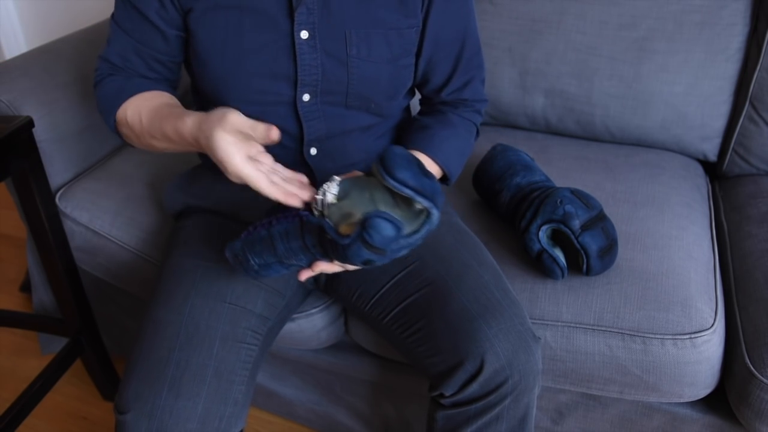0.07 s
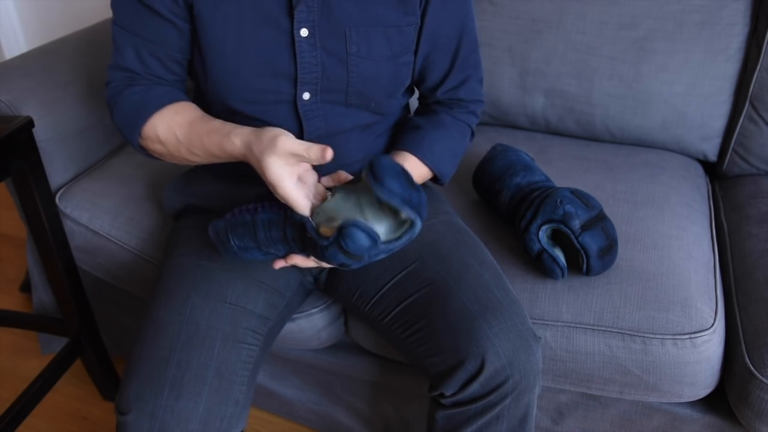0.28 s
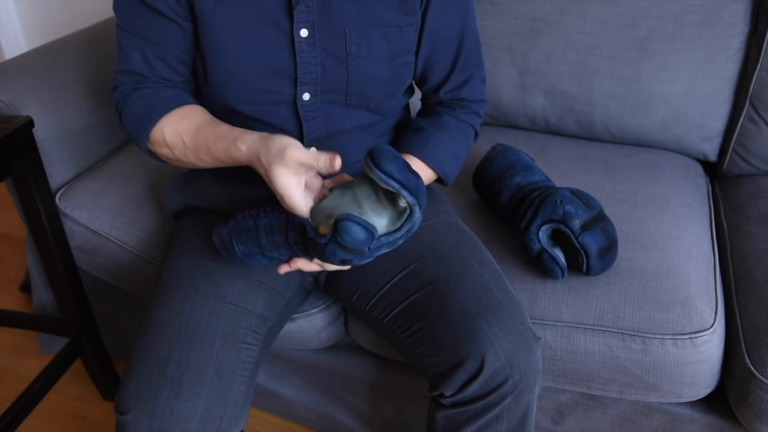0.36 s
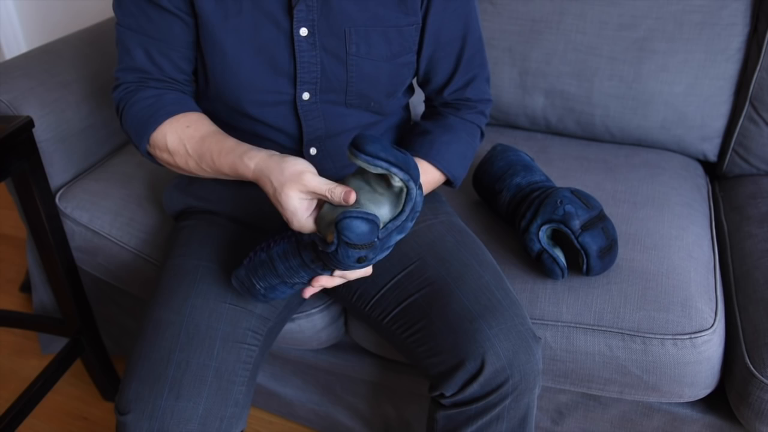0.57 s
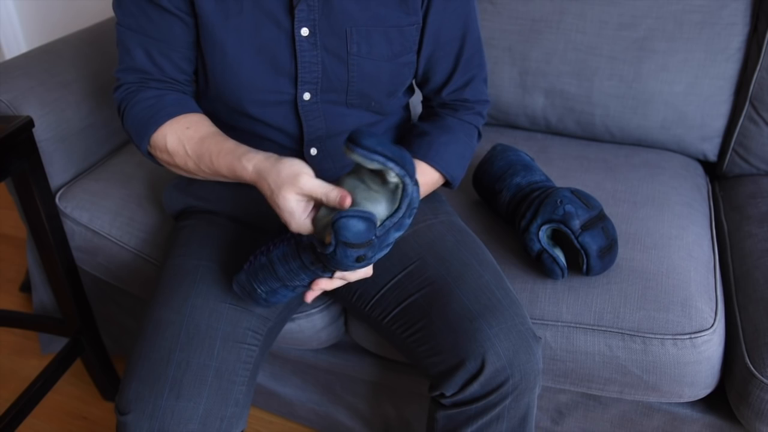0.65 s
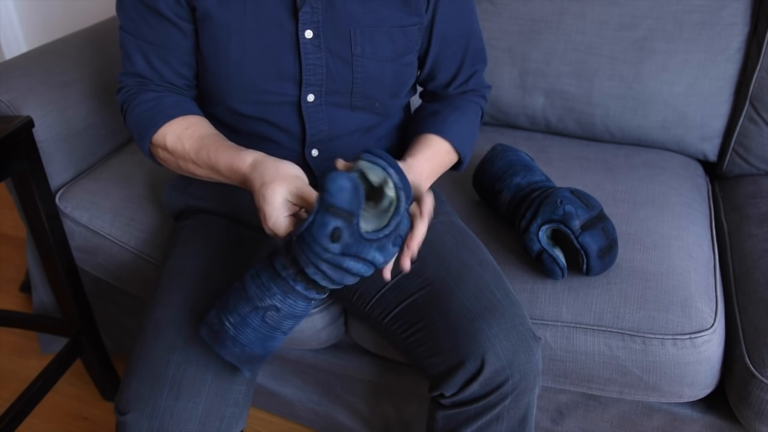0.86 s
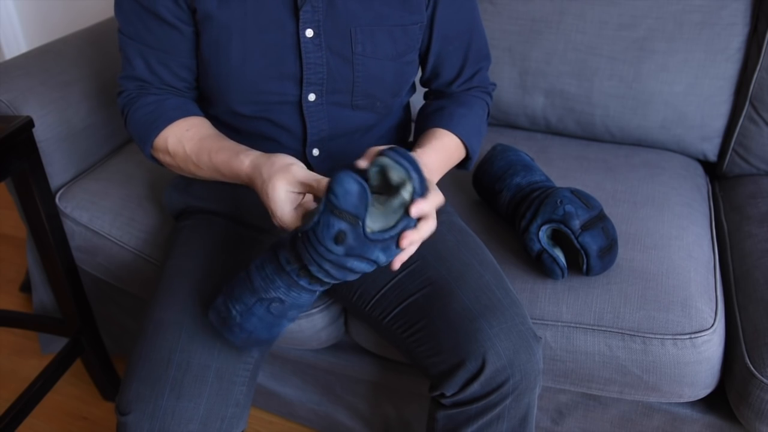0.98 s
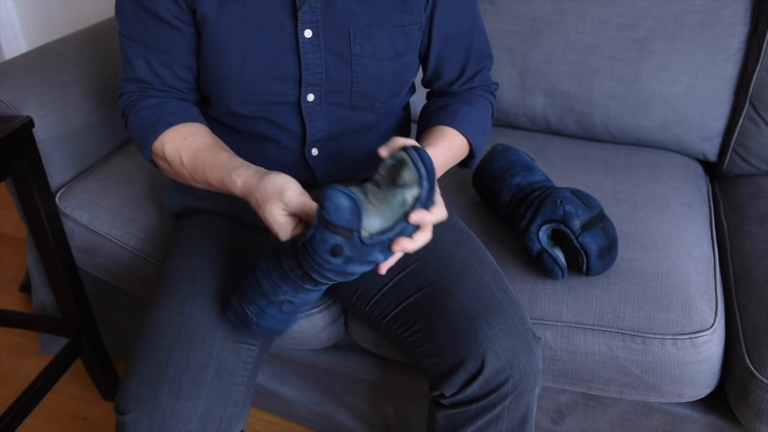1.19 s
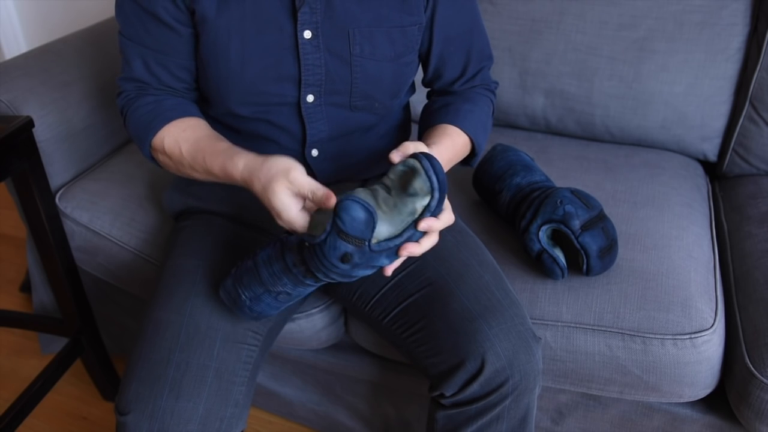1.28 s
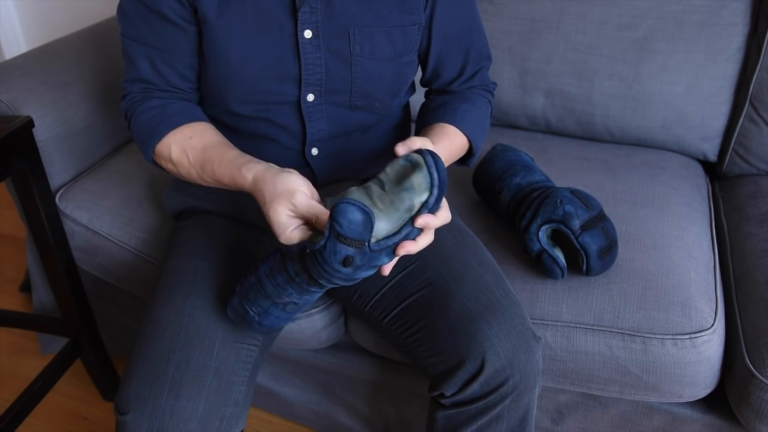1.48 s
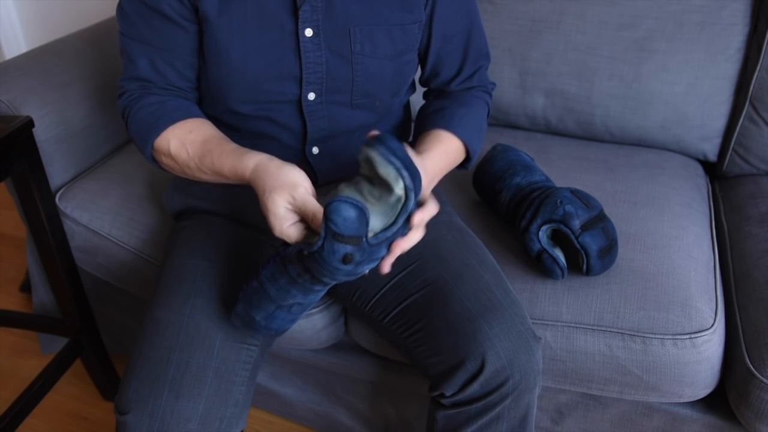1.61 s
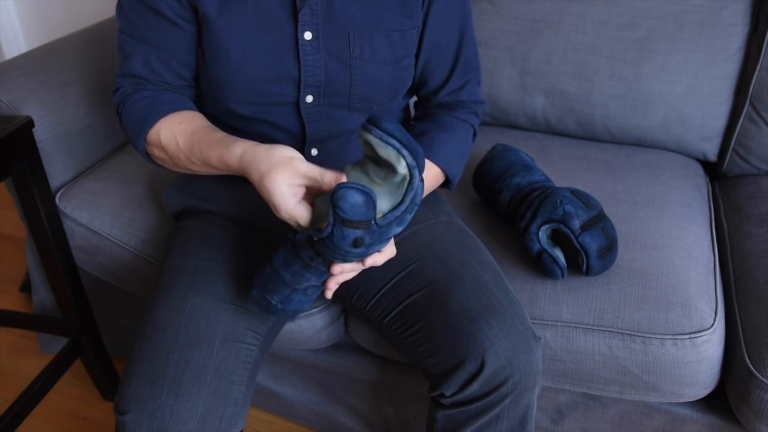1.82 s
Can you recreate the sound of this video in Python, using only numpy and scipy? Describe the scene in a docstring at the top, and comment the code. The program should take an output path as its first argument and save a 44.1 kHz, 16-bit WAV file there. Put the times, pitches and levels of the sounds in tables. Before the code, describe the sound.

Hands rub a padded glove close to the microphone in a quiet room. Dry scuffs, soft finger pats and small crease ticks come first, then lighter rustling strokes with a few more ticks and faint bumps.

```python
"""Close, dry rubbing and rustling: two hands turn a padded glove in a quiet furnished room.
In each stroke the skin catches and slips on the cover: the hollow padding murmurs, the cover rasps,
the weave hisses, and the harder scuffs make the padding groan. Fingers pat the padding and ring its
damped shell, creases tick as they snap over, and the glove bumps softly as it is shifted."""
import sys
import numpy as np
from scipy import signal
from scipy.fft import rfft, irfft
from scipy.io import wavfile

SR = 44100
rng = np.random.default_rng(int(sys.argv[2]) if len(sys.argv) > 2 else 0)


def bounce(signal):
    """Save signal as a 16-bit WAV file at the path given by the first command-line argument."""
    frames = np.transpose(np.atleast_2d(signal))
    limited = np.clip(frames, -1, 1)
    pcm = np.round(limited * 32767).astype(np.int16)
    wavfile.write(sys.argv[1], SR, pcm)


N = 81585


def undb(db):
    """Decibels to gain."""
    return 10 ** (np.asarray(db) / 20)


def unit(x):
    """Scale to rms 1."""
    return x / np.sqrt(np.mean(x ** 2))


def colour(x, outline):
    """Minimum-phase EQ through points of f/Hz, level/dB."""
    hz, db = np.array(outline, float).T
    size = 4096
    freqs = np.maximum(np.arange(size // 2 + 1) * SR / size, 1)
    gain = undb(np.interp(np.log(freqs), np.log(hz), db))
    cepstrum = irfft(np.log(gain))
    cepstrum[1:size // 2] *= 2
    cepstrum[size // 2 + 1:] = 0
    impulse = irfft(np.exp(rfft(cepstrum)))
    return signal.fftconvolve(x, impulse)[:N]


def resonate(x, hz, width):
    """One resonance; width is a share of its frequency, held within 0.05 to 1.5."""
    q = 1 / np.clip(width, .05, 1.5)
    return signal.lfilter(*signal.iirpeak(hz, q, fs=SR), x)


def wander(per_s):
    """Random drift with rms 1, gliding between per_s points a second."""
    knots = rng.standard_normal(4096)
    return unit(np.interp(np.arange(N) / SR * per_s, np.arange(len(knots)), knots))


def fade(t, t60):
    """Exponential decay by 60 dB in t60 seconds."""
    return np.exp(-np.log(1000) * t / t60)


def swell(x, envelope):
    """Shape a sound so that its rms is about 1 at the top of the envelope."""
    shaped = x * envelope
    return shaped * np.sqrt(np.sum(envelope ** 2) / np.sum(shaped ** 2))


def add(out, start, x):
    """Mix a short sound in at start seconds."""
    i = int(start * SR)
    out[i:i + len(x)] += x[:N - i]


def pressure(t, full_at, attack, hold, release):
    """The hand presses, holds and lets go; attack and release each span 20 dB."""
    rise = np.maximum(full_at - t, 0) / attack
    fall = np.maximum(t - full_at - hold, 0) / release
    return undb(-20 * (rise + fall))


def stick_slip(per_s, spread_db):
    """Friction grain: tiny catches of uneven size over even sliding."""
    caught = rng.random(N) < per_s / SR
    size = undb(spread_db * np.minimum(rng.exponential(size=N), 5))
    catches = unit(caught * size * rng.choice([-1, 1], N))
    sliding = 0.55 * rng.standard_normal(N)
    return unit(catches + sliding)


def room_tone():
    """The still room: a faint, dark bed of noise."""
    # spectrum of the room's air: f/Hz, level/dB
    air_eq = [(20, -2), (45, -1.5), (90, -5), (160, -11.5), (290, -12), (400, -23), (1000, -29),
              (3000, -37.5), (8000, -43.5), (16000, -46)]
    return undb(-62) * unit(colour(rng.standard_normal(N), air_eq))


def finger_pats(t):
    """A fingertip's soft push rings the damped shell, higher where it is stretched."""
    # fingers landing: t/s, peak level/dB, contact time/s, shell tension as a pitch factor
    landings = [(0.168, -51, 0.00032, 1.3), (0.1922, -42.5, 0.00042, 0.93), (0.2093, -27.5, 0.00072, 1.04),
                (0.2415, -34.5, 0.0002, 1.59), (0.3257, -40.5, 0.002, 0.87), (0.374, -28.5, 0.00087, 1.17),
                (1.3323, -31.5, 0.00058, 1.13), (1.5205, -35.5, 0.00089, 0.93)]
    # modes of the padded shell: f/Hz, level/dB, t60/s
    shell_modes = [(302, -11.5, 0.04), (503, -1.5, 0.029), (765, -0.5, 0.0049), (1110, 0, 0.0069)]
    out, age = np.zeros(N), t[:4096]
    for start, db, contact, tension in landings:
        ring = sum(undb(mode_db) * np.cos(2 * np.pi * hz * tension * age) * fade(age, t60)
                   for hz, mode_db, t60 in shell_modes)
        push = np.sin(np.pi * np.minimum(age / contact, 1)) ** 2
        pat = signal.fftconvolve(push, ring)[:len(age)]
        add(out, start, -undb(db) * pat / np.abs(pat).max())
    return out


def rubbing(t):
    """Sliding skin drives the padding's murmur, the cover's rasp and the weave's hiss."""
    # hand strokes: t/s at full pressure, attack/s, hold/s, release/s, murmur/dB, rasp/dB, hiss/dB
    strokes = [(0.241, 0.029, 0.021, 0.085, -63, -54.5, -48.5),
               (0.29, 0.029, 0.013, 0.065, -49, -49, -46.5), (0.316, 0.027, 0.022, 0.042, -44.5, -44, -49),
               (0.365, 0.046, 0.02, 0.098, -47, -46, -47), (0.41, 0.013, 0.072, 0.066, -50, -49.5, -53),
               (0.5, .03, 0.043, 0.099, -57.5, -53, -62), (0.607, 0.025, 0.047, 0.067, -56, -54, -57.5),
               (0.676, 0.044, .035, 0.081, -51.5, -53, -61), (0.793, 0.035, 0.015, 0.073, -58, -59.5, -59),
               (0.817, .015, 0.0094, 0.05, -59, -62, -65),
               (0.904, 0.071, 0.0094, 0.037, -53.5, -56.5, -60.5),
               (0.931, 0.053, 0.028, 0.13, -64, -62.5, -61), (1.043, .006, 0.0093, 0.0055, -54.5, -50, -54),
               (1.044, 0.08, 0.024, 0.063, -63.5, -62, -59.5),
               (1.136, 0.059, 0.032, 0.093, -51, -52, -54.5), (1.259, 0.0069, 0.013, 0.12, -57, -56, -68),
               (1.291, 0.028, 0.057, 0.1, -65.5, -60.5, -57), (1.385, 0.055, 0.02, 0.031, -70, -69, -52),
               (1.441, 0.014, 0.029, 0.029, -59.5, -58, -62), (1.505, 0.031, 0.052, 0.12, -55, -57.5, -59),
               (1.520, 0.019, 0.0035, 0.0049, -54, -45.5, -46.5),
               (1.665, 0.058, 0.038, 0.053, -62, -62.5, -67.5),
               (1.756, 0.14, 0.036, 0.032, -74, -63.5, -59.5), (1.825, 0.035, .02, .1, -67.5, -61.5, -63)]
    # tone of the hollow padding, the cover and the weave: f/Hz, level/dB
    murmur_eq = [(100, -32.5), (210, -16), (305, -5), (385, -7.5), (520, -0.5), (780, -2), (1000, -12.5),
                 (1600, -27.5), (5000, -40.5)]
    rasp_eq = [(250, -21), (700, -8), (1100, 1), (1600, -0.5), (2300, 0), (2900, -9), (4200, -11),
               (8000, -40.5), (16000, -56)]
    hiss_eq = [(700, 1), (2200, -1), (4000, 0.5), (6500, -1), (9000, -4), (10500, -9.5), (12500, -14.5),
               (16000, -18)]
    slips_per_s, grip_db = (1300, 1900, 4200), (-70, -68.5, -81.5)  # murmur, rasp, hiss
    grip = pressure(t, full_at=.2, attack=.06, hold=t[-1], release=1)  # the holding hand never rests
    out = np.zeros(N)
    for layer, eq in enumerate((murmur_eq, rasp_eq, hiss_eq)):
        power = (grip * undb(grip_db[layer])) ** 2
        for full_at, attack, hold, release, *layer_db in strokes:
            power += (pressure(t, full_at, attack, hold, release) * undb(layer_db[layer])) ** 2
        grain = stick_slip(slips_per_s[layer], spread_db=2.5)
        out += np.sqrt(power) * unit(colour(grain, eq))
    judder_db = 1.5 * wander(per_s=170)  # all three layers judder together
    return out * unit(undb(judder_db))


def soft_bumps(t):
    """The glove's bulk gives short swells of low rumble as it is shifted."""
    # shifts of the glove: t/s at the crest, Gaussian half-width/s, f/Hz, level/dB
    shifts = [(0.209, .02, 112, -58), (0.255, 0.013, 74.4, -58), (0.364, 0.026, 64.6, -59.5),
              (0.886, 0.021, 104.5, -53.5), (0.903, 0.0071, 58.4, -50), (1.124, 0.0089, 61, -55),
              (1.329, 0.0067, 135, -59), (1.433, 0.009, 65, -59), (1.515, 0.0058, 128, -52.5),
              (1.542, 0.011, 49.6, -48.5)]
    out, width = np.zeros(N), 0.41
    for crest, half_width, hz, db in shifts:
        rumble = resonate(resonate(rng.standard_normal(N), hz, width), hz, width)
        envelope = np.exp(-.5 * ((t - crest) / half_width) ** 2)
        out += undb(db) * swell(rumble, envelope)
    return out


def crease_ticks(t):
    """A fold snaps over with a brief crunch of fibres."""
    # snapping folds: t/s, peak level/dB, f/Hz, bandwidth as a share of f, crunch t60/s
    folds = [(0.2269, -33, 2700, 0.47, 0.003), (0.2427, -29, 7550, 0.86, .004),
             (0.2499, -35.5, 1080, 0.43, 0.002), (0.2494, -34, 5500, 0.87, .003),
             (0.2659, -33, 3650, 0.32, .002), (0.2732, -28.5, 1500, 1.04, 0.009),
             (0.298, -29, 7100, 0.58, .005), (0.3028, -29.5, 2240, 0.17, 0.0038),
             (0.3395, -30.5, 5000, 0.58, .003), (0.3735, -27.5, 2370, 1.2, 0.0014),
             (0.4666, -33.5, 1900, 0.23, 0.0015), (0.4875, -36.5, 2000, 0.17, 0.0018),
             (0.6103, -36.5, 1570, 0.44, 0.0064), (0.6391, -30, 2200, 0.37, 0.0032),
             (0.7955, -50, 5000, .9, .002), (0.9115, -40.5, 2100, 0.67, .002),
             (0.9486, -41, 7500, .9, .002), (0.9612, -40, 5400, 0.87, 0.0047),
             (1.0272, -39, 4450, 2, 0.0018), (1.043, -35.5, 1300, 0.31, 0.0068),
             (1.0672, -39.5, 5050, .9, .003), (1.3227, -35, 5000, 0.53, 0.006),
             (1.3325, -27.5, 4300, 0.2, 0.0014), (1.3326, -31.5, 5650, 0.3, .003),
             (1.3625, -35.5, 2120, 0.56, .003), (1.4442, -40.5, 1950, .7, 0.0043),
             (1.4641, -43, 7460, .8, .003), (1.5226, -27, 6000, 0.49, 0.0028),
             (1.5376, -33.5, 3940, 0.58, 0.0026), (1.5733, -32.5, 2060, 0.43, 0.0013),
             (1.5743, -33.5, 3300, 0.14, 0.0012), (1.5759, -26.5, 4100, 0.29, 0.0017),
             (1.587, -46, 9400, 0.67, .002), (1.721, -43, 4800, 0.34, 0.0018)]
    out, age = np.zeros(N), t[:1024]
    for start, db, hz, width, t60 in folds:
        crunch = 0.43 * rng.standard_normal(len(age)) * fade(age, t60)
        crunch[0] += 2  # the snap itself
        ring = resonate(crunch, hz, width)
        tick = resonate(ring, hz, 3.4 * width)  # trims the skirts of the ring
        add(out, start, undb(db) * tick / np.abs(tick).max())
    return out


def scuff_groans(t):
    """Dragging skin catches slowly and rings one broad resonance of the padding."""
    # hard scuffs: t/s at full pressure, hold/s, level/dB, f/Hz
    drags = [(0.329, 0.0076, -46, 522), (0.34, 0.057, -55, 311), (0.362, 0.01, -49, 830),
             (0.408, .015, -47, 547), (0.693, 0.027, -58, 610), (0.819, 0.0086, -53.5, 740),
             (1.141, 0.022, -49.5, 544), (1.152, 0.021, -49.5, 343), (1.337, .002, -47.5, 650)]
    out, width = np.zeros(N), 0.34
    for full_at, hold, db, hz in drags:
        grain = stick_slip(per_s=460, spread_db=1)
        groan = resonate(resonate(grain, hz, width), hz, width)
        envelope = pressure(t, full_at, attack=0.013, hold=hold, release=0.018)
        out += undb(db) * swell(groan, envelope)
    return out


def room_reverb(x, t):
    """The short, dull reflections of a furnished room."""
    wet_db, predelay_s, damping_hz = -19.5, 0.00362, 3600
    tail = rng.standard_normal(N) * fade(t, t60=0.33) * (t > predelay_s)
    tail = signal.lfilter(*signal.butter(1, damping_hz, fs=SR), tail)
    tail /= np.sqrt(np.sum(tail ** 2))
    return undb(wet_db) * signal.fftconvolve(x, tail)[:N]


def scene():
    """The glove and the still room in one mono mix, panned slightly left."""
    t = np.arange(N) / SR
    glove = rubbing(t) + scuff_groans(t) + crease_ticks(t) + finger_pats(t) + soft_bumps(t)
    mix = room_tone() + glove + room_reverb(glove, t)
    pan_db = [[1.5], [-1.5]]  # left, right
    return mix * undb(pan_db)


def record(dry):
    """A steep high cut at 16 kHz."""
    return signal.sosfilt(signal.ellip(10, .1, 70, 16000, fs=SR, output="sos"), dry)


dry = scene()
out = record(dry)
bounce(out)
```